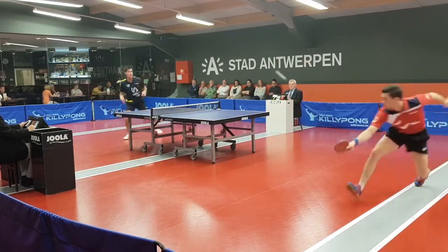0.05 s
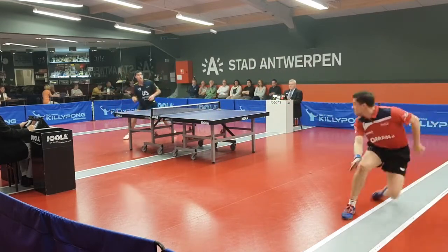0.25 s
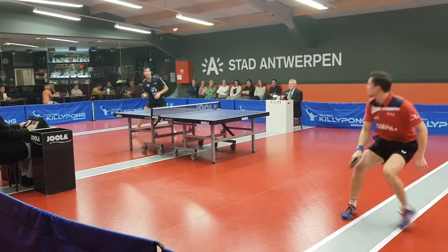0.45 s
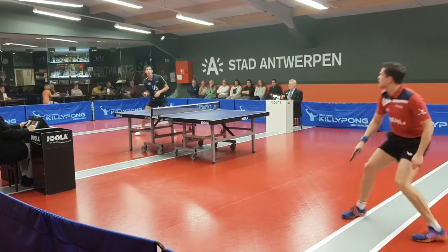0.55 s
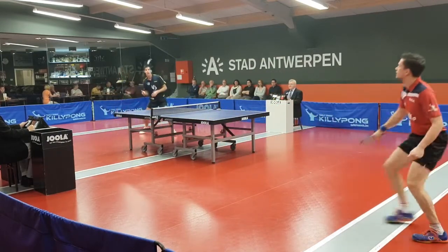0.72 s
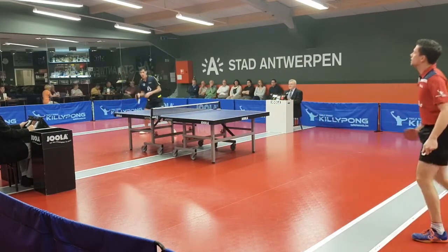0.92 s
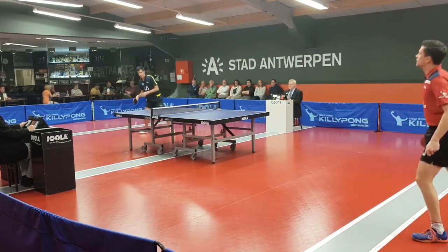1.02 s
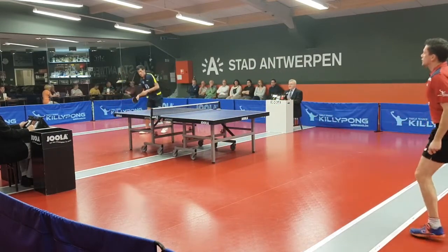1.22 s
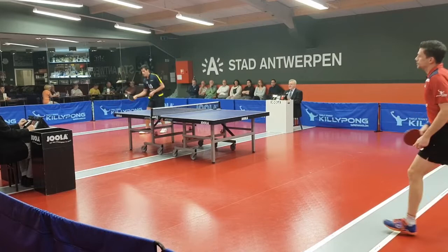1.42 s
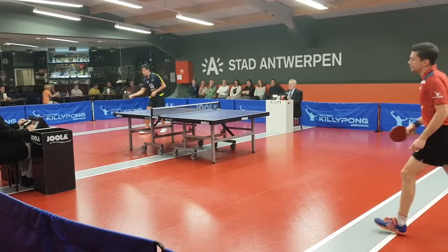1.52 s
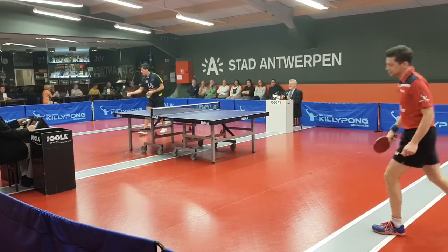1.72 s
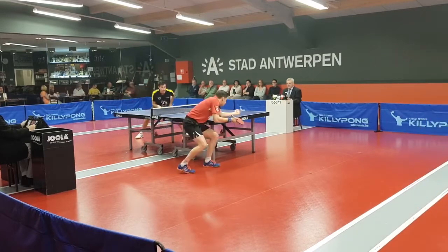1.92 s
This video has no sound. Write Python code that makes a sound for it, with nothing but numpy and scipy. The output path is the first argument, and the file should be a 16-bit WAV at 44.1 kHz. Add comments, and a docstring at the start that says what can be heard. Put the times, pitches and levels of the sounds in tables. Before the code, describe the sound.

A table tennis ball clicks on the table right at the start. Soles scuff briefly, and at 0.25 seconds a racket strikes the ball with a booming foot stamp. A faint squeak and a soft step follow around 0.65 seconds. The ball bounces more softly on the far end at 1.2 seconds and knocks on the floor at 1.7. Each hit rings through a large hall over dull ventilation.

```python
"""A table tennis ball clicks in a large sports hall: it bounces on the table, is returned with a stamp
of the foot, comes down on the table again, then lands on the floor. Each hit makes ball and surface ring.
The click arrives directly, then off nearby surfaces, then as a long ring of the hall.
Feet make the springy floor boom, soles scuff and squeak, and the ventilation rushes underneath."""
import sys
import numpy as np
from scipy import signal
from scipy.fft import rfft, irfft
from scipy.io import wavfile

SR = 44100
rng = np.random.default_rng(int(sys.argv[2]) if len(sys.argv) > 2 else 0)


def unload_audio(sound):
    """Save the sound as a 16-bit wav file, at the path given as the first command line argument."""
    columns = np.transpose(np.atleast_2d(sound))
    # keep every value between -1 and 1, then stretch to whole-number steps
    steps = np.round(np.clip(columns, -1, 1) * 32767)
    wavfile.write(sys.argv[1], SR, steps.astype(np.int16))


N = 85995

# how much the two ears differ, against what they share (f/Hz, level/dB)
STEREO_WIDTH = [(50, -30), (150, -16.5), (330, -12.5), (650, -5.5), (1300, 2), (5000, -0.5), (14000, 1)]
# tone of the ventilation (f/Hz, level/dB)
AIR_TONE = [(25, -10), (70, -11.5), (100, 3.5), (200, 2), (400, -4.5), (700, -5), (1200, -13.5),
            (2400, -33.5), (5000, -29.5), (8000, -42.5), (15000, -41)]
# how long the hall rings; t60 is the time to fade by 60 dB (f/Hz, t60/s)
HALL_DECAY = [(60, 1.34), (120, 1.18), (250, 1.72), (700, 2.6), (1500, 1.56), (4500, 1.49), (9000, 0.82),
              (15000, 0.66)]
# tone of the hall's ring (f/Hz, level/dB)
HALL_TONE = [(35, 0), (60, 6.5), (80, -6), (105, -1), (170, 6.5), (400, 0), (1500, -3), (5000, -4),
             (14000, -2.5)]
# sliding soles (t/s, length/s, centre f/Hz, width/Hz, level/dB)
SOLE_SCUFFS = [(0.142, 0.053, 3780, 250, -46.5), (.222, 0.024, 3630, 410, -41.5),
               (0.968, 0.077, 11000, 5970, -69.5)]
# tone of the squeaking sole (f/Hz, level/dB)
SQUEAK_TONE = [(200, 5), (1000, 4), (2300, -9), (3200, 0), (4000, 9.5), (4450, 10), (4900, 15), (5400, -1),
               (6200, -17), (7600, -22), (8600, -4), (9600, 11.5), (10700, -6), (12500, -13), (16000, -16)]
# notes at which the springy floor booms (f/Hz, level/dB, t60/s, rise/s)
FLOOR_NOTES = [(55.1, -15.5, 0.12, 0.0033), (108.4, 7, 0.073, 0.009), (163.8, -8.5, 0.12, 0.0054),
               (227.5, -8, 0.0756, 0.0033), (269, -13, 0.05, 0.0011)]
# feet landing (t/s, level/dB, hall level/dB)
FOOTFALLS = [(.135, -30.5, -7), (.2310, -12.5, 1.5), (0.2508, 5, -5.5), (0.691, -29, -17)]
# hollow knock of the floor under the ball (f/Hz, level/dB, t60/s)
KNOCK_NOTES = [(730, -29, 0.044), (1070, -37, .05), (1406, -22, 0.074), (2090, -28, 0.027)]
# ring of ball and surface, per surface; the ball's shell gives the peaks above 8 kHz (f/Hz, level/dB)
CLICK_TONES = { "table, near end": [(100, 2.5), (350, 6), (950, 16.5), (1550, 13.5), (2350, 1.5),
               (3450, 12), (4100, 7.5), (4800, 8), (5700, 0), (7800, -3.5), (8600, 17.5), (9250, 3),
               (10400, 12.5), (11800, 6), (13400, -12), (16000, -25)], "racket": [(100, 8.5), (300, 22.5),
               (720, 25), (1050, 15.5), (1700, 17.5), (2600, 11.5), (3400, 10.5), (4200, 10), (5400, 9),
               (6300, 11), (7700, 1), (9000, 7.5), (12000, 2), (13600, -5), (16000, -14)],
               "table, far end": [(100, 4.5), (300, 5.5), (1000, 5), (1700, 14.5), (2500, 0), (3600, 8),
               (4500, -2.5), (5500, -12), (6300, -13), (7900, -0.5), (8600, 16), (9300, 6), (10500, 15),
               (11800, 9.5), (13400, -5), (16000, -6.5)], "floor": [(100, -7), (400, 12), (1400, 15),
               (2000, 7), (2900, 6), (3800, 2), (5300, 6.5), (6500, -2.5), (7700, -6), (9400, 14),
               (10700, 12.5), (12200, 3.5), (13500, -1), (16000, -11)]}
# separate echoes of each hit (delay/ms, level/dB, left ear lag/ms)
HIT_ECHOES = {"first bounce": [(3.6, -3, -0.32), (15.01, -7, 0), (35, -16, 0.17), (68.5, -5, -0.31)],
              "return": [(2.8, -6.5, -0.32), (7.6, -5, 0.143), (14.0, -13, -0.125)],
              "second bounce": [(1.8, -13.5, 0.11), (15.8, -1.5, 0)], "landing": [(1.9, 1, 0.049),
              (8.2, -12.5, 0.13), (16.1, -6.5, 0.37)]}
# the ball's hits (name, surface, t/s, level/dB, scatter level/dB, hall level/dB, left ear lag/ms)
BALL_HITS = [("first bounce", "table, near end", .0088, -12, 1.1, 14, 0.153),
             ("return", "racket", .2496, -3.5, -0.21, 4.02, 0.12),
             ("second bounce", "table, far end", 1.2108, -21.5, 6.3, 16.24, -0.048),
             ("landing", "floor", 1.7040, -6, 1, 6.44, 0.432)]
# left ear against right ear (f/Hz, level/dB)
EAR_BALANCE = [(100, 1.7), (500, 0), (3000, -0.55)]

AIR_DB, SCUFF_HALL_DB = -29, 9
HALL_BUILD_S, HALL_GRAIN = 0.022, 0.21
SCATTER_T60_S, SCATTER_BUILD_S, SCATTER_GRAIN = 0.13, 0.0007, 0.54
SMEAR_S = 0.0014
SQUEAK_S, SQUEAK_LENGTH_S = .620, 0.0086
SQUEAK_DB, SQUEAK_SCATTER_DB, SQUEAK_HALL_DB = -33.5, -2, 5
FADE_S, FADE_LENGTH_S = 1.902, 0.0052
LOW_CUT_HZ, TOP_HZ = 41, 15900

TIME = np.arange(N) / SR
FREQS = np.arange(N + 1) * SR / (2 * N)  # spectra span 2 * N samples, to leave room for echoes
EARS = np.array([[.5], [-.5]])  # splits a difference between left and right


def undb(db):
    """Turn decibels into a gain."""
    return 10 ** (np.asarray(db) / 20)


def curve(points, hz):
    """Read between a table's (frequency, value) points, with octaves evenly spaced."""
    freqs, values = np.array(points, float).T
    return np.interp(np.log(np.maximum(hz, 1)), np.log(freqs), values)


def decay(t60):
    """A fade that falls by 60 dB every t60 seconds."""
    return np.exp(-np.log(1000) * TIME / t60)


def sharp_click(db):
    """Spectrum of the shortest click with this tone and no sound before its start."""
    cepstrum = irfft(np.log(undb(db)))
    cepstrum[1:N] *= 2  # fold the part before the start onto the part after it
    cepstrum[N + 1:] = 0
    return np.exp(rfft(cepstrum))


def arrival(delay_s, lag_ms):
    """Stereo spectrum of a delay, with the left ear lag_ms behind the right."""
    return np.exp(-2j * np.pi * FREQS * (delay_s + EARS * lag_ms / 1000))


def diffuse(grain):
    """Stereo spectrum of noise from all sides, alike in both ears in the bass; grain roughens it."""
    noise = rng.standard_normal((2, N))
    flicker = np.repeat(rng.standard_normal(N // 16 + 1), 16)[:N]
    mid, side = rfft(noise * np.exp(grain * flicker - grain ** 2), 2 * N)
    width = undb(curve(STEREO_WIDTH, FREQS))
    return np.array([mid + width * side, mid - width * side]) / np.sqrt(1 + width ** 2)


def ventilation():
    """A steady, dull rush of air fills the hall."""
    return irfft(diffuse(grain=0) * undb(AIR_DB + curve(AIR_TONE, FREQS)))[:, :N]


def hall_ring():
    """Stereo spectrum of the hall's ring: it builds up, then each octave dies at its own rate."""
    noise, ring = diffuse(HALL_GRAIN), 0
    lowest_hz = 62.5
    octave = np.clip(np.log2(np.maximum(FREQS, 1) / lowest_hz), 0, 8)
    for k in range(9):
        band = irfft(noise * np.maximum(1 - abs(octave - k), 0))[:, :N]
        ring = ring + band * decay(curve(HALL_DECAY, lowest_hz * 2 ** k))
    ring = ring * (1 - np.exp(-TIME / HALL_BUILD_S)) / np.sqrt(SR / 10)
    return rfft(ring, 2 * N) * undb(curve(HALL_TONE, FREQS))


def scatter():
    """Stereo spectrum of the first small echoes off table, barriers and seats."""
    envelope = decay(SCATTER_T60_S) * (1 - np.exp(-TIME / SCATTER_BUILD_S))
    noise = irfft(diffuse(SCATTER_GRAIN))[:, :N]
    return rfft(noise * envelope / np.linalg.norm(envelope), 2 * N)


def smear():
    """Spectrum of one echo: an uneven surface spreads it into a tiny burst of noise."""
    burst = rng.standard_normal(N) * np.exp(-TIME / SMEAR_S)
    return rfft(burst / np.linalg.norm(burst), 2 * N)


def scuffs(hall):
    """Soles slide briefly: a narrow band of noise squeaks, a wide one hisses."""
    out = 0
    for start, length, hz, width_hz, db in SOLE_SCUFFS:
        band = 1 / (1 + (2 * (FREQS - hz) / width_hz) ** 2)
        rub = irfft(rfft(rng.standard_normal(N), 2 * N) * band)[:N]
        swell = np.sin(np.pi * np.clip((TIME - start) / length, 0, 1))
        out = out + undb(db) * rub / rub.std() * swell
    return irfft(rfft(out, 2 * N) * (1 + undb(SCUFF_HALL_DB) * hall))[:, :N]


def squeak(hall):
    """A sole slips for an instant: a rough chirp near 5 kHz and an octave above."""
    swell = np.sin(np.pi * np.clip((TIME - SQUEAK_S) / SQUEAK_LENGTH_S, 0, 1))
    slip = rfft(rng.standard_normal(N) * swell, 2 * N)
    tone = sharp_click(SQUEAK_DB + curve(SQUEAK_TONE, FREQS))
    paths = arrival(0, lag_ms=.18) + undb(SQUEAK_SCATTER_DB) * scatter() + undb(SQUEAK_HALL_DB) * hall
    return irfft(slip * tone * paths)[:, :N]


def footfalls(hall):
    """Feet set the springy floor booming, and the hall holds the boom."""
    boom, paths = 0, 0
    for hz, db, t60, rise in FLOOR_NOTES:
        onset = 1 - np.exp(-(TIME / rise) ** 2)
        boom = boom + undb(db) * np.sin(2 * np.pi * hz * TIME) * decay(t60) * onset
    for start, db, hall_db in FOOTFALLS:
        paths = paths + undb(db) * arrival(start, 0) * (1 + undb(hall_db) * hall)
    return irfft(rfft(boom, 2 * N) * paths)[:, :N]


def floor_knock():
    """Spectrum of the short, hollow ring of the floor panels under the ball."""
    ring = sum(undb(db) * np.sin(2 * np.pi * hz * TIME) * decay(t60) for hz, db, t60 in KNOCK_NOTES)
    return rfft(ring, 2 * N)


def ball(hall):
    """Ball and surface click at each hit, heard directly, off nearby surfaces and around the hall."""
    out = 0
    for name, surface, start, db, scatter_db, hall_db, lag_ms in BALL_HITS:
        click = sharp_click(curve(CLICK_TONES[surface], FREQS) + db)
        direct = arrival(0, lag_ms)
        echoes = sum(undb(echo_db) * smear() * arrival(delay_ms / 1000, echo_lag_ms)
                     for delay_ms, echo_db, echo_lag_ms in HIT_ECHOES[name])
        sound = click * (direct + echoes + undb(scatter_db) * scatter() + undb(hall_db) * hall)
        if surface == "floor":
            sound = sound + floor_knock() * direct
        out = out + sound * arrival(start, 0)
    return irfft(out)[:, :N]


def scene():
    """The rally plays over the ventilation; its ringing stops abruptly just before the end."""
    hall = hall_ring()
    rally = ball(hall) + footfalls(hall) + scuffs(hall) + squeak(hall)
    fade = np.clip(1 - (TIME - FADE_S) / FADE_LENGTH_S, 0, 1)
    return rally * fade + ventilation()


def record(dry):
    """Lean a little to one side, thin the deepest bass, clip at full scale and cut the highest treble."""
    balance = undb(EARS * curve(EAR_BALANCE, FREQS))
    low_cut = FREQS ** 2 / np.hypot(FREQS ** 2, LOW_CUT_HZ ** 2)
    wave = irfft(rfft(dry, 2 * N) * balance * low_cut)[:, :N]
    top_cut = signal.ellip(8, .2, 70, TOP_HZ, fs=SR, output="sos")
    return signal.sosfilt(top_cut, np.clip(wave, -1, 1))


dry = scene()
out = record(dry)
unload_audio(out)
```